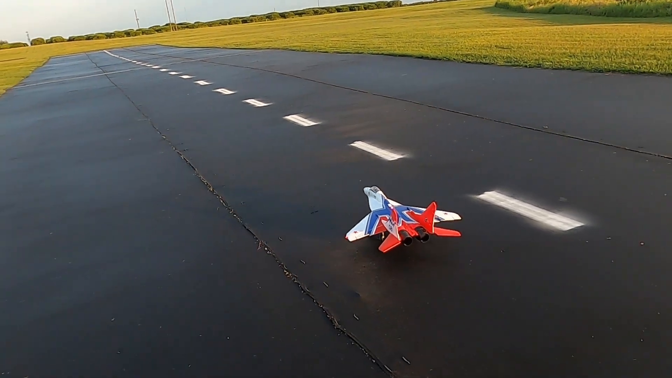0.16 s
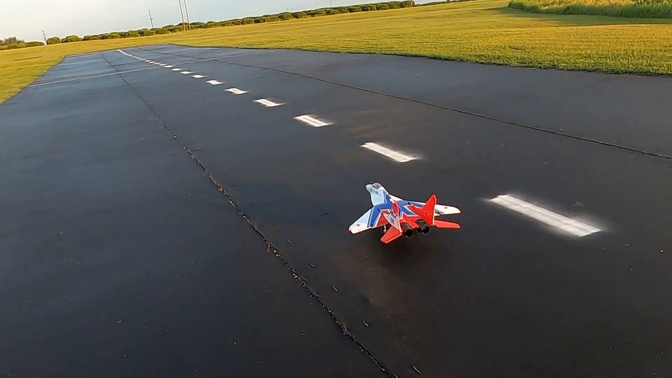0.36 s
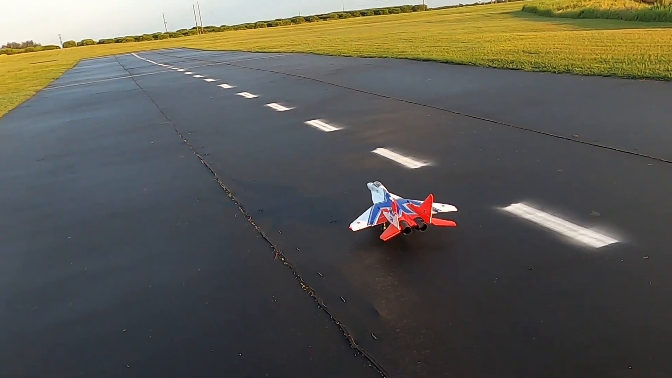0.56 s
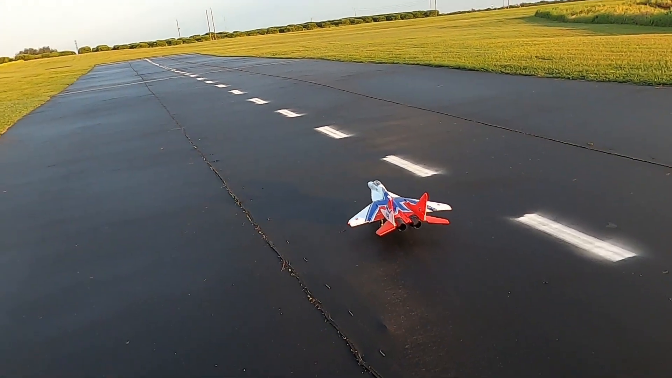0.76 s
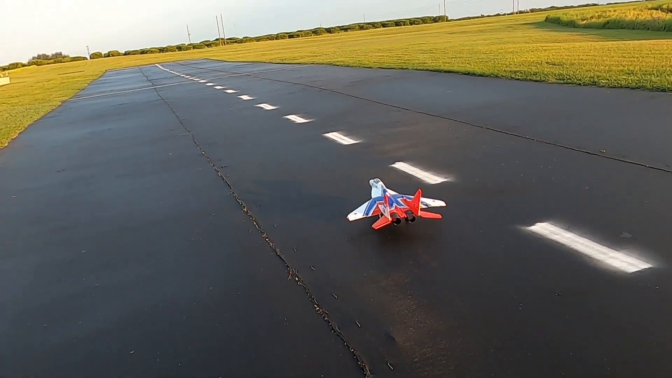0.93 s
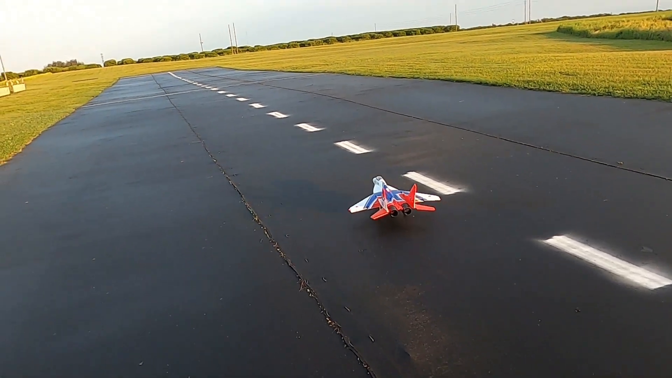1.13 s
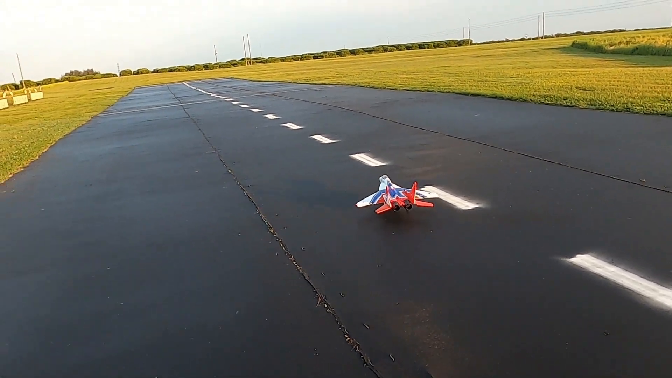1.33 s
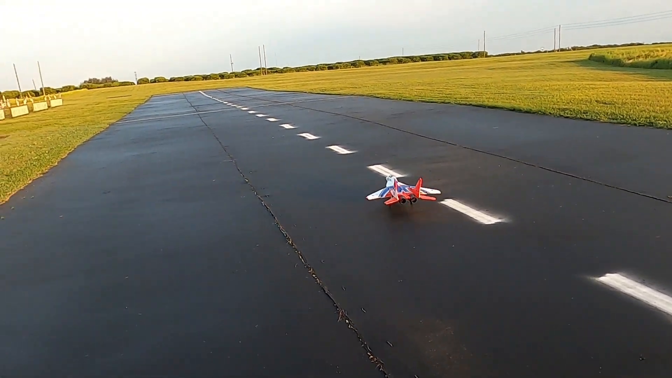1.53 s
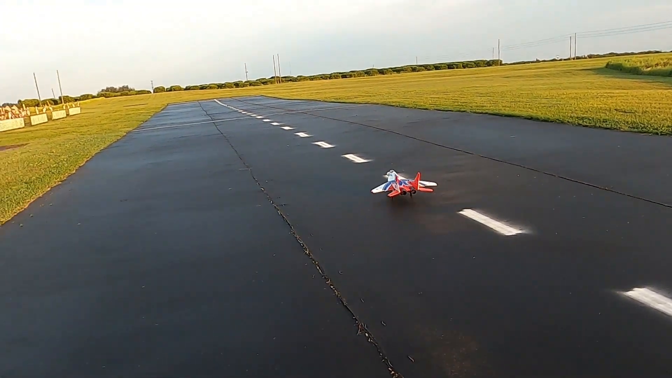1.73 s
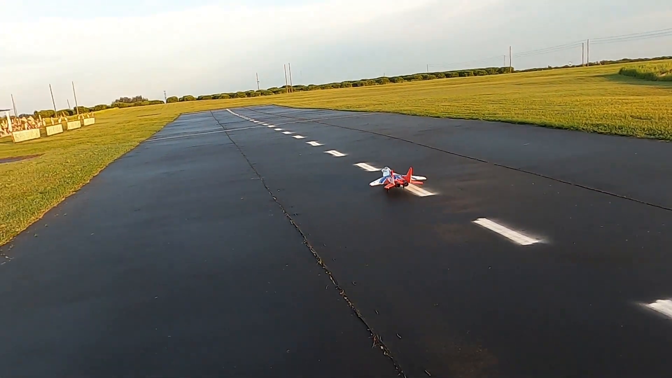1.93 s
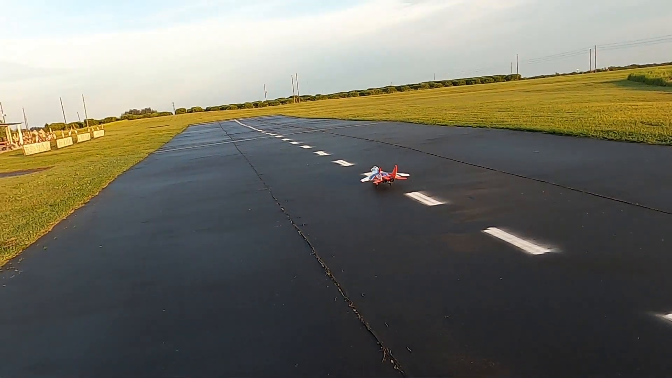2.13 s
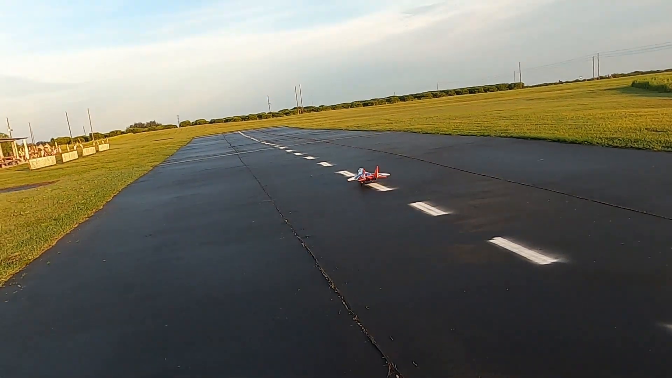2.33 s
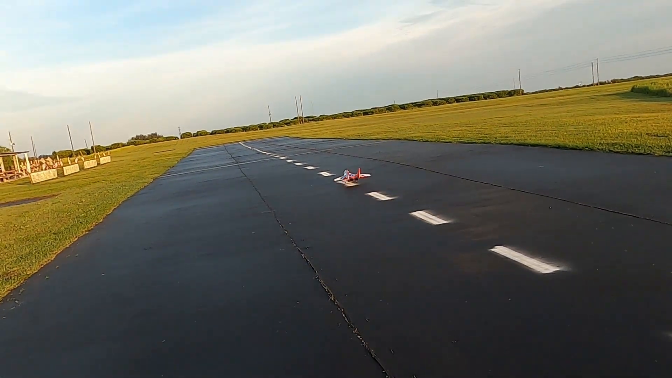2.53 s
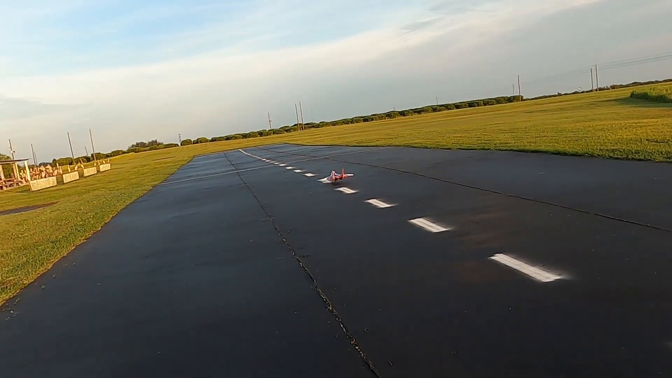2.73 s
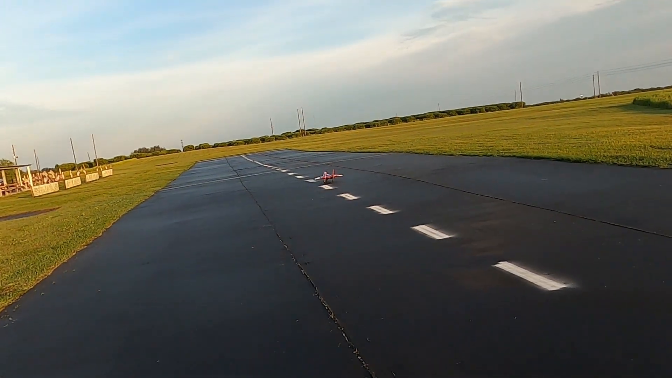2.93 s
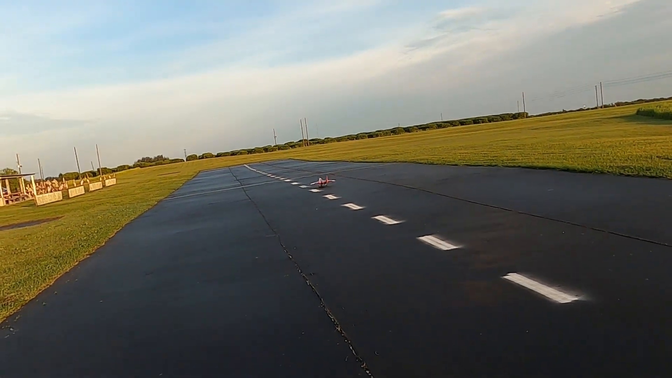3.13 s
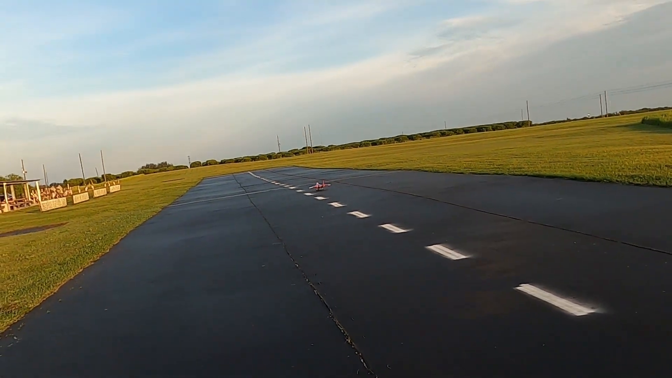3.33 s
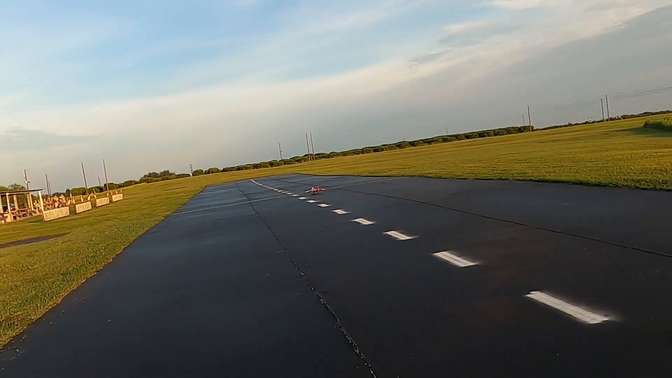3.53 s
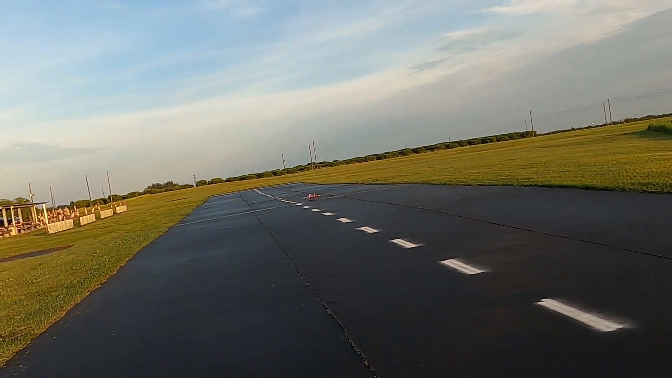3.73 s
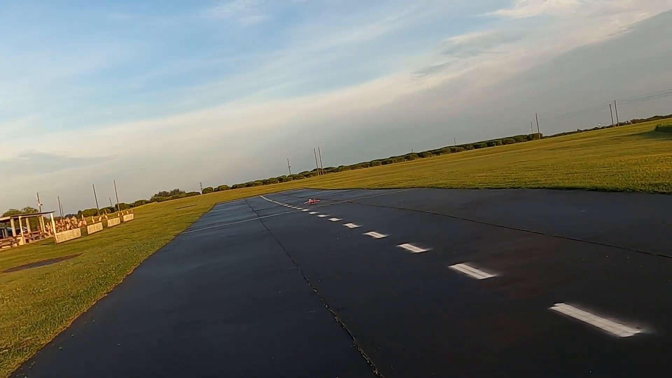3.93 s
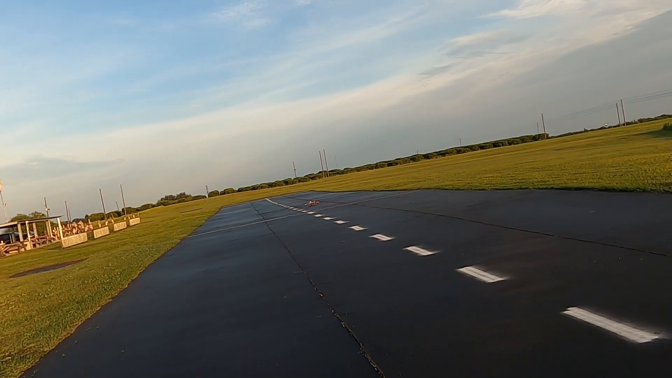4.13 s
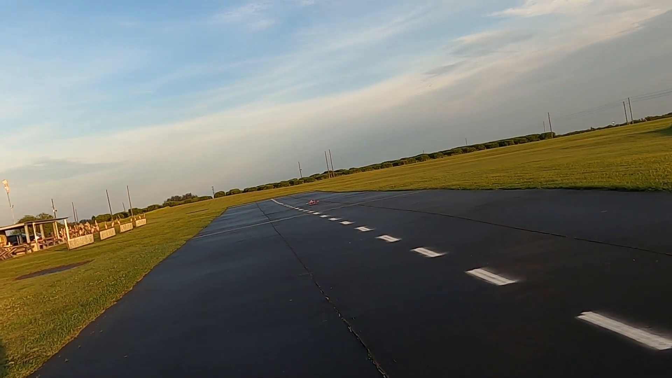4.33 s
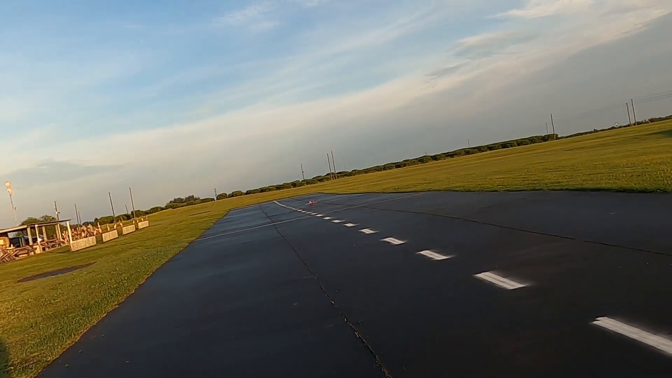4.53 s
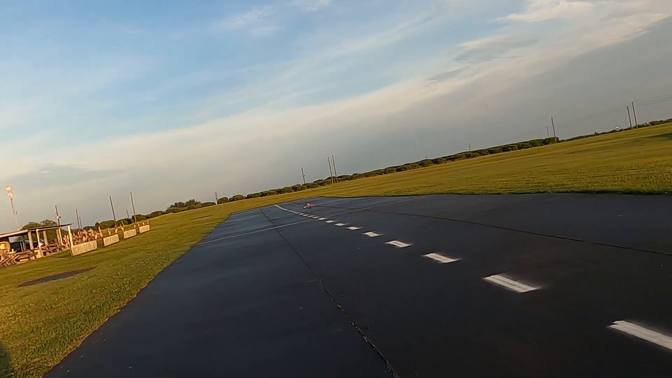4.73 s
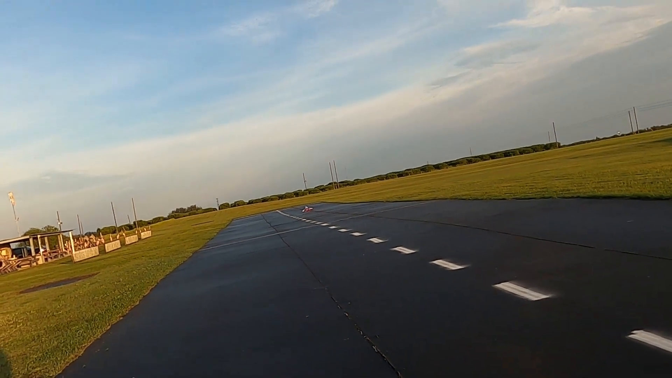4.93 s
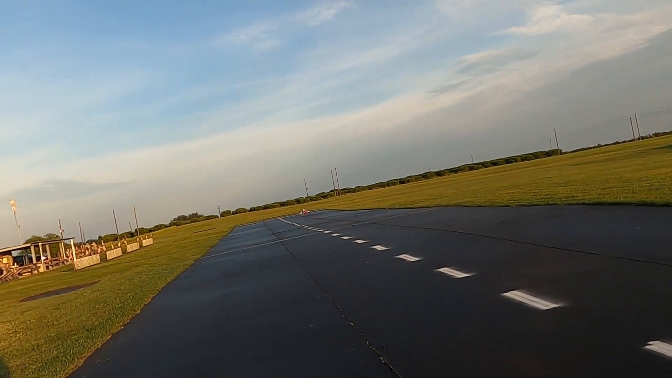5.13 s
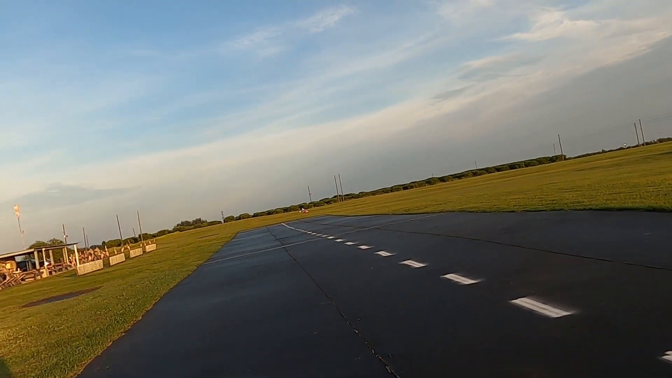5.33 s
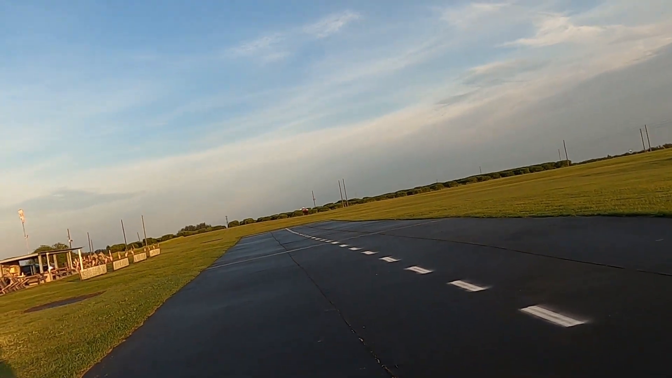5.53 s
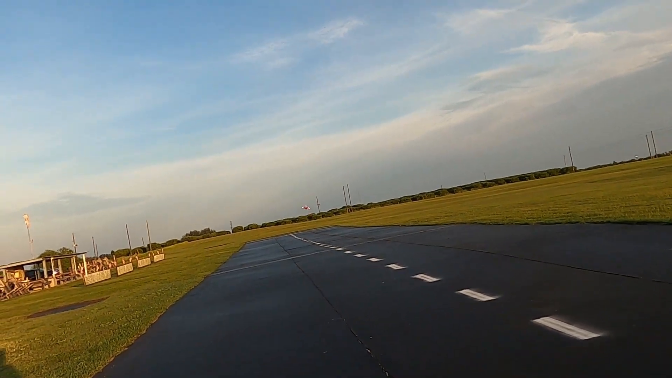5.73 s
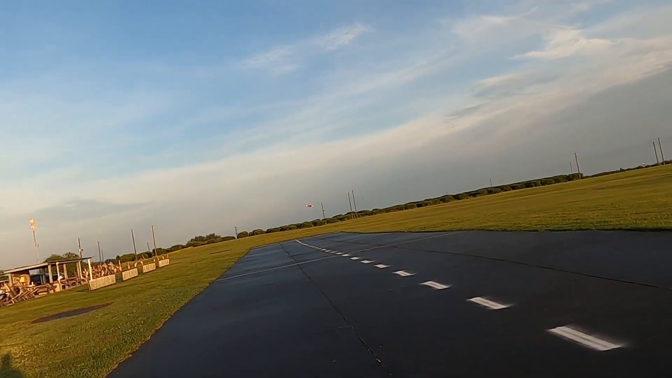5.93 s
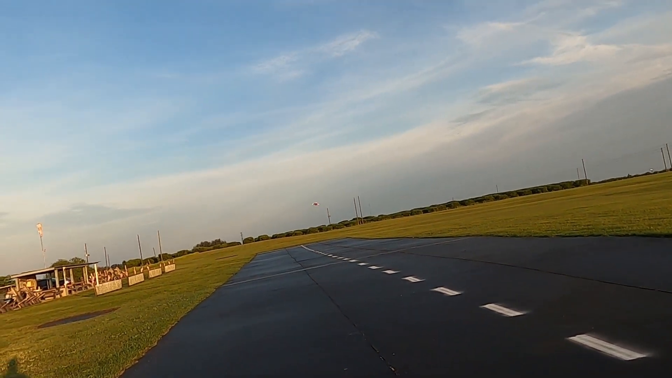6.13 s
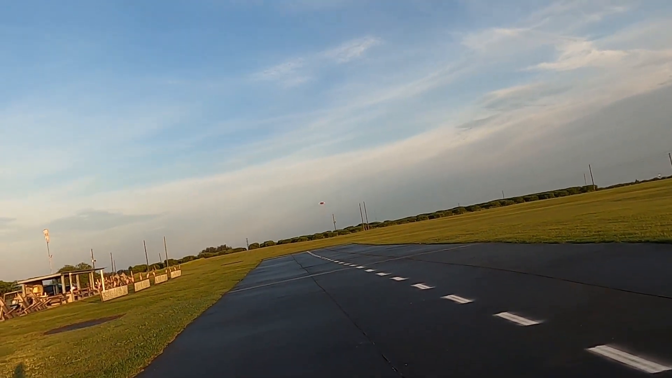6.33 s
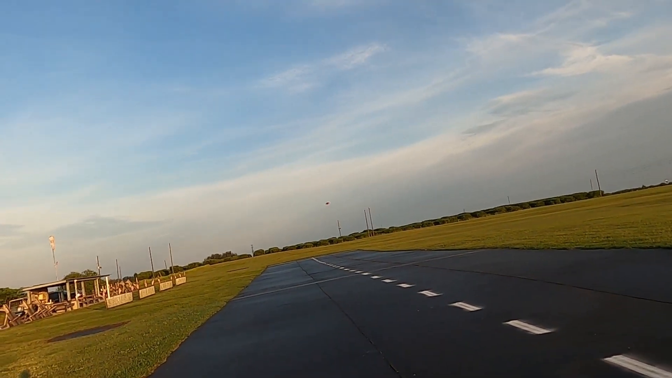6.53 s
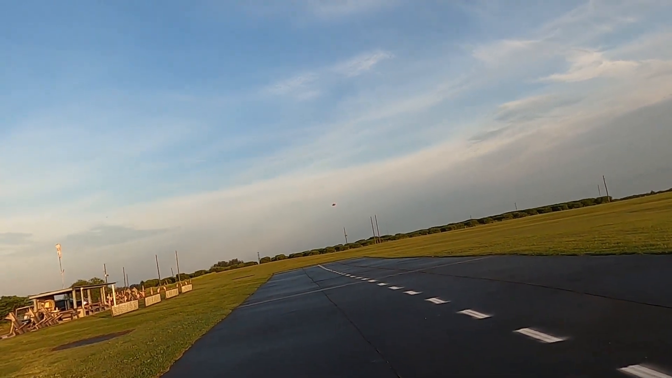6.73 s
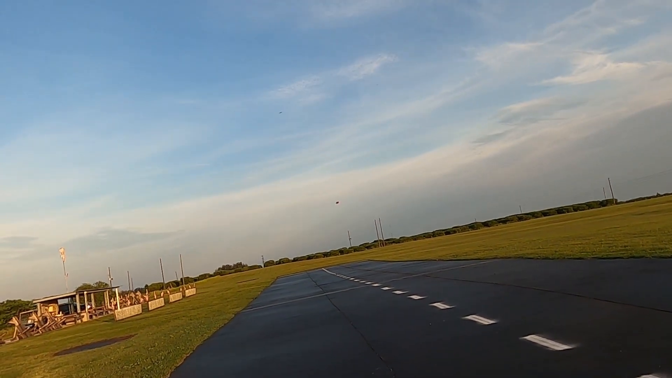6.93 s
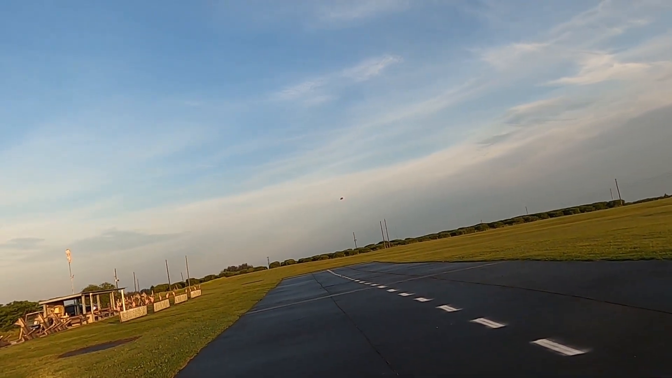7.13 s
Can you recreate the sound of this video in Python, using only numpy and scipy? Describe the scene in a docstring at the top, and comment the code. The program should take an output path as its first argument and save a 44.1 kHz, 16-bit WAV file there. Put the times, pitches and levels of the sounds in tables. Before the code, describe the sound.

A small twin-fan model jet whines up to a piercing pitch with a harsh air rush, races away outdoors and fades, then a plastic click.

```python
"""Model jet taking off

A model jet with two electric ducted fans spools up on a paved runway, rolls away and lifts off after five seconds.
Fan speed, distance and the aim of the nozzles set the whine of the blades and the noisy rush of the exhaust.
The bounce off the pavement combs the rush with peaks and dips, and the comb sweeps down as the jet climbs.
Faint tones, a tiny tick and a fainter rising chirp join in; a light breeze touches the two-port microphone,
and plastic clicks close by near the end."""
import sys
import numpy as np
from scipy import signal
from scipy.fft import rfft, irfft, next_fast_len
from scipy.io import wavfile

SR = 44100
rng = np.random.default_rng(int(sys.argv[2]) if len(sys.argv) > 2 else 0)


def output_pcm(signal):
    """Save a mono or channel-first signal as 16-bit PCM at the path in sys.argv[1].

    Samples are clipped to [-1, 1] before scaling.
    """
    pcm = np.clip(np.atleast_2d(signal).T, -1, 1) * 32767
    wavfile.write(sys.argv[1], SR, np.round(pcm).astype(np.int16))


N = 321092
T = np.arange(N) / SR

# the full-power pitch that levels and air loss refer to
FULL_POWER_HZ = 8200
# at full power the pitch sinks towards this much lower, as the battery sags and the jet gathers speed
SAG_FROM_S, SAG_HZ, SAG_S = 2.3, 400, 1.45
# the take-off run, straight away from the microphone
START_M, ROLL_S, THRUST_M_S2, TOP_SPEED_M_S = 0.77, 0.57, 1.725, 8.74
MIC_HEIGHT_M, NOZZLE_HEIGHT_M = 1.576, 0.06
# the climb: lift-off, the time it takes to round out, rate of climb and its growth
LIFT_S, ROUND_OUT_S, CLIMB_M_S, CLIMB_M_S2 = 5.3, 0.018, 1.844, 0.38
# the jet counts as below the microphone up to the first distance, and as ahead of it from the second
BELOW_M, AHEAD_M = 2.7, 5.0
# half angle of the cone behind the nozzles in which the treble is weak
CONE_DEG = 19.4
# loss in the air at FULL_POWER_HZ; it grows with the square of frequency
AIR_DB_PER_M = 0.0625
# share of the sound that bounces, before the treble fades
BOUNCE_SHARE = 0.68
# pitch above which the bounce fades: on the ground, at microphone height, and from STEEP_M up
BOUNCE_ROLLING_HZ, BOUNCE_FLYING_HZ, BOUNCE_STEEP_HZ, STEEP_M = 2880, 7000, 3700, 2.8
# the dips fill in as the jet climbs about this far above the horizon
DIPS_FILL_DEG = 3.6
# hump of hiss around the blade tone: height and half width
WAKE_DB, WAKE_WIDTH_HZ = 3.5, 570
# the whine at 1 m and full power, its change per doubling of fan speed, and its change inside the cone
WHINE_DB, WHINE_SPEED_DB, WHINE_CONE_DB = -21.5, 2.5, -15
# how much slower the second fan turns (share of the speed), and how far that wanders (share of the slip)
SPOOL_SLIP, FULL_SLIP, SLIP_WANDER = 0.0068, 0.0028, 0.452
# light breeze before its filter and gusting, dB per Hz
BREEZE_DB = -81.5
TOP_HZ = 14200


def undb(db):
    """Turn decibels into gain."""
    return 10 ** (np.asarray(db) / 20)


def bump(x, centre, width):
    """A bell of height 1; it has dropped to about a third one width from its centre."""
    return np.exp(-((x - centre) / width) ** 2)


def curve(rows, t, axis=1):
    """One column of a table, joined by straight lines."""
    rows = np.asarray(rows, float)
    return np.interp(t, rows[:, 0], rows[:, axis])


def colour(rows, hz, axis=1):
    """A spectrum joined by straight lines over log frequency."""
    rows = np.asarray(rows, float)
    return np.interp(np.log(hz + 1), np.log(rows[:, 0]), rows[:, axis])


def walk(rate, t=T):
    """Smooth chance with a spread near 1, turning about rate times a second."""
    knots = rng.standard_normal(int(rate * N / SR) + 2)
    smooth = signal.resample(knots, len(knots) * 16)
    return np.interp(t * rate * 16, np.arange(len(smooth)), smooth)


def noise(gain_at, channels=1, size=1024):
    """Unrelated noises shaped by gain_at(Hz, s), a gain per root Hz."""
    frame = dict(fs=SR, nperseg=size, noverlap=size - size // 4)
    white = rng.standard_normal((channels, N)) * np.sqrt(SR / 2)
    hz, t, bins = signal.stft(white, **frame)
    _, shaped = signal.istft(bins * gain_at(hz[:, None], t), **frame)
    return shaped[:, :N]


def filtered(x, gain_at):
    """A fixed filter with the response gain_at(Hz)."""
    size = next_fast_len(N + SR // 10)
    hz = np.fft.rfftfreq(size, 1 / SR)
    return irfft(rfft(x, size) * gain_at(hz), size)[..., :N]


def blade_rate(t):
    """Blade rate of the leading fan in Hz: it first sinks a little, climbs in steps to full power, then sags."""
    # throttle curve before the sag: (time [s], blade rate [Hz])
    throttle_steps = [(0, 4680), (.05, 4660), (.13, 4490), (.3, 4398), (.46, 4365), (.59, 4737),
                      (.71, 5300), (.82, 5504), (.91, 5900), (.97, 6360), (1.04, 6619), (1.1, 6660),
                      (1.22, 6660), (1.29, 6767), (1.48, 6745), (1.55, 7001), (1.63, 7111), (1.83, 8030),
                      (2.02, 8130), (2.13, 8440), (2.3, 8485)]
    sag = SAG_HZ * (1 - np.exp(-np.maximum(t - SAG_FROM_S, 0) / SAG_S))
    return curve(throttle_steps, t) - sag


def position(t):
    """Metres along the runway and above it: thrust works against drag, then the jet climbs."""
    rolling = np.maximum(t - ROLL_S, 0)
    drag_m = TOP_SPEED_M_S ** 2 / THRUST_M_S2
    along = START_M + drag_m * np.log(np.cosh(THRUST_M_S2 * rolling / TOP_SPEED_M_S))
    # seconds in the air, with a soft start
    flying = ROUND_OUT_S * np.logaddexp(0, (t - LIFT_S) / ROUND_OUT_S)
    height = NOZZLE_HEIGHT_M + CLIMB_M_S * flying + CLIMB_M_S2 * flying ** 2 / 2
    return along, height


def sight(t):
    """Distance in metres and degrees above the horizon, as seen from the microphone."""
    along, height = position(t)
    above_mic = height - MIC_HEIGHT_M
    return np.hypot(along, above_mic), np.degrees(np.arctan2(above_mic, along))


def radiated(t, full_db, speed_db, cone_db):
    """Level in dB sent to the microphone: it follows fan speed and changes when the nozzles point at it."""
    # the nose lifts just before the wheels leave the ground: (time [s], angle [degrees])
    nose_up = [(4.77, -6), (4.9, 2), (5.1, 12), (5.3, 21.5), (6, 48), (7.28, 40)]
    _, elevation = sight(t)
    in_cone = bump(elevation, curve(nose_up, t), CONE_DEG)
    doublings = np.log2(blade_rate(t) / FULL_POWER_HZ)
    return full_db + speed_db * doublings + cone_db * in_cone


def journey(hz, t):
    """Change in dB on the way to the microphone: spreading, loss in the air and passing swells."""
    # part of the spectrum swells or sinks for a moment:
    # (time [s], half length [s], centre [Hz], half width [octaves], level [dB])
    swell_rows = [(0.206, 0.058, 284, 1.2, 6), (0.773, 0.13, 415, 1, 4), (1.1, 0.42, 193, 0.54, 3),
                  (1.466, 0.28, 2940, 1.26, -2.5), (1.73, 0.095, 3440, 0.29, 3),
                  (1.853, 0.46, 2310, 0.15, -11), (2.184, 0.18, 9800, 0.4, 6.5),
                  (2.603, 0.3, 1900, 1.1, 3.5), (3.067, 0.26, 6960, 2.8, 3.5), (3.66, 0.2, 7800, 1.45, 5),
                  (4.494, 0.14, 2840, 0.72, 4.5), (4.955, 0.096, 7640, 0.74, 6),
                  (5.344, 0.18, 3380, 0.78, 6), (5.674, 0.29, 2400, 0.69, 3), (5.45, 0.65, 7950, 0.49, 5),
                  (0.152, 0.3, 3550, 0.13, 4.5), (2.55, 0.22, 2520, 0.11, 2), (2.57, .1, 7660, 0.13, 4),
                  (1.85, .16, 1780, .13, 2), (.2, .6, 1580, .09, 2.5), (.2, .45, 1230, .08, 2),
                  (0.998, 0.3, 12900, 0.23, 6), (1.05, 0.33, 7560, 0.14, 4.5), (2.1, .16, 13300, .12, 4),
                  (4.25, 0.27, 7500, 0.38, 3), (7, 1, 3000, 1.5, 2), (6.25, 0.56, 610, 0.43, -3),
                  (2.8, 0.4, 11000, 0.56, 3), (5.2, .3, 12500, .25, 6)]
    distance, _ = sight(t)
    swells = 0
    for at, length, centre_hz, octaves, db in swell_rows:
        nearness = bump(np.log2((hz + 1) / centre_hz), 0, octaves)
        swells = swells + db * bump(t, at, length) * nearness
    spreading = 20 * np.log10(distance)
    air_loss = AIR_DB_PER_M * distance * (hz / FULL_POWER_HZ) ** 2
    return swells - spreading - air_loss


def pavement(hz, t):
    """Gain of direct sound plus its bounce, late by the longer path; the treble bounces less cleanly."""
    along, height = position(t)
    direct_m = np.hypot(along, MIC_HEIGHT_M - height)
    bounced_m = np.hypot(along, MIC_HEIGHT_M + height)
    lag = (bounced_m - direct_m) / 343  # speed of sound in m/s
    # a steep bounce scatters more
    fade_hz = np.interp(height, [0, MIC_HEIGHT_M, STEEP_M],
                        [BOUNCE_ROLLING_HZ, BOUNCE_FLYING_HZ, BOUNCE_STEEP_HZ])
    share = BOUNCE_SHARE / (1 + (hz / fade_hz) ** 2)
    return abs(1 + share * np.exp(-2j * np.pi * hz * lag))


def resonances(hz, t):
    """Peaks and dips in dB that slide with the direction of the jet; the dips fill in as it climbs."""
    # pitch slides as the jet moves from below the microphone to the horizon:
    # (pitch below [Hz], pitch at the horizon [Hz], half width [Hz], level [dB])
    peaks_and_dips = [(736, 496, 61, -3), (760, 688, 41, 5), (977, 1008, 38, 4.5), (1586, 1205, 85, -12.5),
                      (1860, 1490, 174, 3.5), (1836, 2040, 142, -4.5), (2570, 2410, 73, 1),
                      (2940, 2700, 99, -3), (3430, 3110, 170, 3.5), (4000, 3730, 110, -3),
                      (4110, 3980, 110, 3.5), (4160, 4340, 110, -2), (4750, 4730, 190, 3.5),
                      (5260, 5450, 130, -3), (7800, 7230, 380, 4)]
    distance, elevation = sight(t)
    steepness = MIC_HEIGHT_M / distance
    dip_depth = bump(np.maximum(elevation, 0), 0, DIPS_FILL_DEG)
    total = 0
    for below_hz, far_hz, width_hz, db in peaks_and_dips:
        centre_hz = far_hz + (below_hz - far_hz) * steepness
        depth = dip_depth if db < 0 else 1
        total = total + db * depth * bump(hz, centre_hz, width_hz)
    return total


def exhaust(dull_hz=8100, dull_width_hz=1200, dull_db=-8, dull_s=2.5, flutter_db=.5, shimmer_db=0.76):
    """Turbulent air rushes from the nozzles, fluttering as a whole, and each register shimmers in moving air."""
    # colour added to the registers: (frequency [Hz], level [dB])
    rush_colour = [(60.0, -36), (110.0, -21.5), (170.0, -6.5), (300.0, 0.5), (600.0, -2.5), (1200.0, 0.5),
                   (2200.0, 3), (3500.0, -1), (4600.0, 0.9), (5600.0, -1.3), (6700.0, -6), (7600.0, -1.6),
                   (9000.0, 1.5), (12500.0, -14), (14000.0, -18.5)]
    # rumble, roar, rush and hiss, before that colour: (centre [Hz], level at 1 m and full power [dB per Hz],
    # change per doubling of fan speed [dB], change inside the cone [dB])
    registers = [(283, -52, 6, 2), (1126, -46, 13.5, -2), (3580, -51.5, 10, -9), (9400, -61, 7, -11)]
    # how alike the two ports hear it: (frequency [Hz], share of the power that arrives directly [0 to 1])
    port_likeness = [(100, 0.94), (1000, 0.95), (4000, .89), (6000, 0.78), (6600, 0.65), (7500, 0.93),
                     (8100, 0.97), (9000, 0.53), (11500, 0.33), (13000, 0.36)]
    centres = [row[0] for row in registers]

    def gain_at(hz, t):
        db = colour(rush_colour, hz) + flutter_db * walk(22, t)
        # each row of weights picks one register, fading into its neighbours
        for (_, full_db, speed_db, cone_db), weights in zip(registers, np.eye(len(registers))):
            register_db = radiated(t, full_db, speed_db, cone_db) + shimmer_db * walk(28, t)
            db = db + colour(list(zip(centres, weights)), hz) * register_db
        # a broad dip near 8 kHz fades out over the first seconds
        db = db + dull_db * bump(t, 0, dull_s) * bump(hz, dull_hz, dull_width_hz)
        # blades chop the turbulent inflow into a hump of hiss around their tone
        wake_db = WAKE_DB * bump(hz, blade_rate(t), WAKE_WIDTH_HZ)
        plain = undb(db + wake_db + journey(hz, t)) * pavement(hz, t)
        # only the direct part has the peaks and dips of its direction; the scattered part fills them in
        return np.array([plain * undb(resonances(hz, t)), plain, plain])

    def likeness(hz):
        return np.clip(colour(port_likeness, hz), 0, 1)

    direct, *scattered = noise(gain_at, channels=3)
    shared = filtered(direct, lambda hz: np.sqrt(likeness(hz)))
    separate = filtered(np.array(scattered), lambda hz: np.sqrt(1 - likeness(hz)))
    return shared + separate


def fan(blade_hz, wander=0.00047, jitter=0.0028, flutter_db=2.5, duct_hz=11200):
    """Passing blades make a tone and an overtone; uneven inflow shakes their pitch and level."""
    # before flutter and the duct: (multiple of the blade rate, level [dB])
    fan_orders = [(1, -3), (2, -17.5)]
    hz = blade_hz * (1 + wander * walk(30.06) + jitter * walk(500))
    phase = 2 * np.pi * np.cumsum(hz) / SR
    total = np.zeros(N)
    for k, db in fan_orders:
        # the duct lets little of the highest pitches out
        duct = 1 / (1 + (k * hz / duct_hz) ** 20)
        total += undb(db + flutter_db * walk(90)) * duct * np.sin(k * phase)
    return total * np.sqrt(2)


def whine(lead_db=-1, second_db=-9):
    """Two fans on one throttle, slightly apart in speed, beat against each other."""
    # the whine flares or fades briefly: (time [s], half length [s], level [dB])
    waver_rows = [(0.02, 0.066, 5), (0.232, 0.04, -11), (0.343, 0.045, 3.5), (0.575, 0.025, 5.5),
                  (0.655, 0.06, -4), (0.925, 0.013, -4), (1.417, 0.11, -2.5), (1.58, .04, 2),
                  (1.687, .05, -4), (2.0, 0.1, -7), (2.15, 0.05, 2), (2.22, .025, -6), (2.4, 0.23, 1.5),
                  (5.297, 0.11, 5), (5.68, 0.17, 3.5), (7.2, .4, -4)]
    hz = blade_rate(T)
    slip = np.where(T < SAG_FROM_S, SPOOL_SLIP, FULL_SLIP) * (1 + SLIP_WANDER * walk(3))
    pair = undb(lead_db) * fan(hz) + undb(second_db) * fan(hz * (1 - slip))
    wavers = sum(db * bump(T, at, length) for at, length, db in waver_rows)
    level_db = radiated(T, WHINE_DB, WHINE_SPEED_DB, WHINE_CONE_DB)
    return pair * undb(level_db + journey(hz, T) + wavers)


def tones(flutter_db=2.5):
    """Faint wavering sine tones and short blips swell and fade under the rush."""
    # level is before flutter: (start [s], end [s], pitch [Hz], level [dB], waver [share of the pitch])
    tone_rows = [(-.1, .62, 952, -35, .014), (.58, .9, 968, -33.5, .016), (-.2, .8, 472, -42, .014),
                 (.25, .34, 9930, -49, .002), (4.055, 4.09, 1500, -35, .008),
                 (5.08, 5.97, 677, -46.8, .003), (5.9, 7.6, 677, -59, .003), (5.4, 8.4, 158, -53.5, .003)]
    out = np.zeros(N)
    for start, end, hz, db, waver in tone_rows:
        progress = np.clip((T - start) / (end - start), 0, 1)
        swell = np.sqrt(np.abs(np.sin(np.pi * progress)))
        phase = 2 * np.pi * np.cumsum(hz * (1 + waver * walk(70))) / SR
        out += swell * undb(db + flutter_db * walk(25)) * np.sin(phase)
    return out


def ports(x):
    """Sound reaches the two ports with different lags and levels; from close below, left has treble notches."""
    # (frequency [Hz], phase by which the left port leads [radians])
    port_phase = [(0, 0), (600, -.5), (2000, -.7), (4400, -1.55), (5300, -2.75), (6000, -3.1), (6400, -4.2),
                  (7060, -6.9), (7500, -8.2), (8000, -8.9), (8150, -8.8), (8450, -9.25), (9300, -8.8),
                  (10700, -8.9), (12000, -6.7), (13200, -7.5), (14000, -9.3)]
    # left minus right: (frequency [Hz], level from below [dB], level from ahead [dB])
    port_balance = [(60, 2.5, 3), (380, 0, 0.5), (750, -2.5, -1), (1290, -1.3, -0.5), (1500, 0, -0.5),
                    (2400, .5, 1.5), (4300, 1, 1.5), (4900, 3.5, 4), (5600, -6, 3), (6140, -1.5, -3),
                    (6700, -14, -2), (7050, 1, .5), (7500, 4.5, 6), (8150, -.5, -.5), (8570, -8, -6.5),
                    (9300, -9, -8), (10200, -11, -4.5), (11400, -21, -5), (12500, -14, -1.5),
                    (13500, -7, -2)]

    def response(hz, axis):
        # each port takes half of the difference, and their mean power stays the same
        half = undb(colour(port_balance, hz, axis) / 2) * np.exp(.5j * curve(port_phase, hz))
        mean_power = (abs(half) ** 2 + abs(half) ** -2) / 2
        return np.array([half, 1 / half]) / np.sqrt(mean_power)

    distance, _ = sight(T)
    ahead = np.interp(distance, [BELOW_M, AHEAD_M], [0, 1])
    from_below = filtered(x, lambda hz: response(hz, axis=1))
    from_ahead = filtered(x, lambda hz: response(hz, axis=2))
    return (1 - ahead) * from_below + ahead * from_ahead


def outdoors(gust_db=4.5, breeze_hz=115, lowest_hz=70, apart=0.9):
    """The low murmur of the open field, and low-pitched gusts that partly differ between the ports."""
    # open-air background: (frequency [Hz], level [dB per Hz])
    field_colour = [(30, -95), (110, -91), (155, -78.5), (205, -77), (280, -82), (350, -102), (2000, -100),
                    (12000, -125)]
    # before the filter and gusting: (time [s], half length [s], level [dB per Hz])
    gust_rows = [(.1, .1, -76), (.68, 0.24, -66), (.98, .04, -67), (2.0, .06, -71), (2.35, 0.16, -78),
                 (2.719, .2, -75), (6.48, 0.12, -73), (6.85, 0.08, -78)]

    def gusts(hz, t):
        band = hz ** 2 / (hz ** 2 + lowest_hz ** 2) / (1 + (hz / breeze_hz) ** 4)
        breeze = undb(BREEZE_DB) + sum(undb(db) * bump(t, at, length) for at, length, db in gust_rows)
        return breeze * undb(gust_db * walk(10, t)) * band

    field = noise(lambda hz, t: undb(colour(field_colour, hz)), size=4096)
    common, *own = noise(gusts, channels=3, size=4096)
    return field + common + apart * np.array(own)


def tick_and_chirp():
    """A tiny high tick, then a fainter short chirp: brief sine bursts that rise in pitch."""
    # (time [s], half length [s], pitch [Hz], rise [Hz per s], level [dB])
    burst_rows = [(3.836, .002, 4250, 60000, -36.5), (4.706, .013, 5730, 16000, -59)]
    out = np.zeros(N)
    for at, length, hz, rise, db in burst_rows:
        since = T - at
        phase = 2 * np.pi * (hz + rise * since / 2) * since
        out += undb(db) * bump(T, at, length) * np.sin(phase)
    return out


def click():
    """A snap and two softer rebounds ring a small plastic body."""
    # the contacts: (time [s], peak level [dB], contact time [ms])
    contacts = [(6.9368, -12.5, 0.087), (6.9394, -16.5, 0.29), (6.9426, -21.5, 0.27)]
    # what rings, before each contact sets the mix: (pitch [Hz], level [dB], time to fall 60 dB [s])
    modes = [(508, -11.5, 0.04), (655, -12, 0.089), (920, -2, .02), (1367, -2.5, 0.065), (1780, -1, .012),
             (2370, 4.5, 0.012), (2810, -1, 0.017), (3500, 7, 0.0062), (4140, 3.5, 0.013),
             (4660, 8, 0.0044)]
    out, t = np.zeros(N), np.arange(SR // 10) / SR
    for start, db, contact_ms in contacts:
        contact = contact_ms / 1000
        ring = np.zeros(len(t))
        for k, (hz, mode_db, t60) in enumerate(modes):
            # a longer contact feeds the high modes less
            softening = 1 + (2 * hz * contact) ** 2
            ring += (-1) ** k * undb(mode_db - 60 * t / t60) * np.sin(2 * np.pi * hz * t) / softening
        # the ring builds up over the contact
        ring *= 1 - bump(t, 0, contact)
        i = int(start * SR)
        out[i:i + len(t)] += undb(db) * ring / np.abs(ring).max()
    return out


def scene():
    """The jet and faint tones pass through the ports; the open air, tick, chirp and click are added."""
    jet_and_tones = exhaust() + whine() + tones()
    return ports(jet_and_tones) + outdoors() + tick_and_chirp() + click()


def record(dry):
    """A steep low-pass filter cuts the top of the treble."""
    top_cut = signal.ellip(12, .2, 80, TOP_HZ, fs=SR, output="sos")
    return signal.sosfilt(top_cut, dry)


dry = scene()
out = record(dry)
output_pcm(out)
```